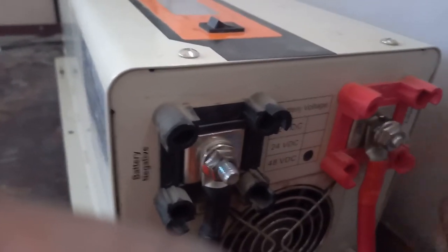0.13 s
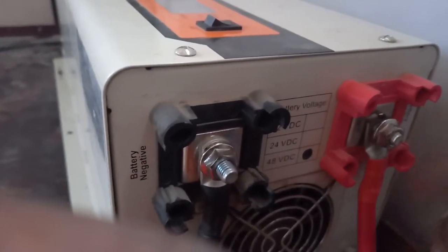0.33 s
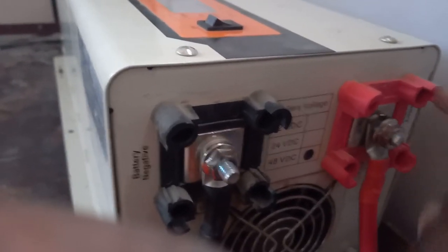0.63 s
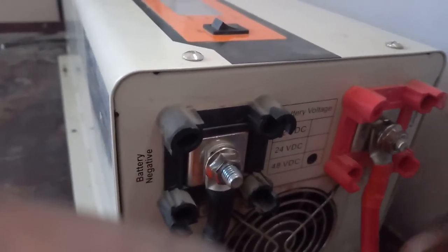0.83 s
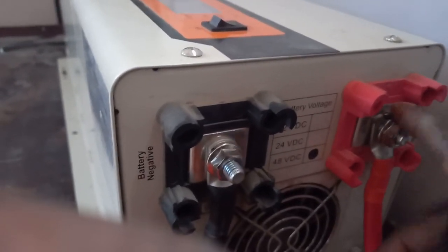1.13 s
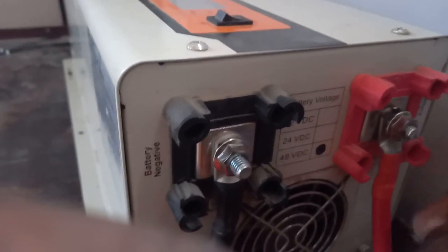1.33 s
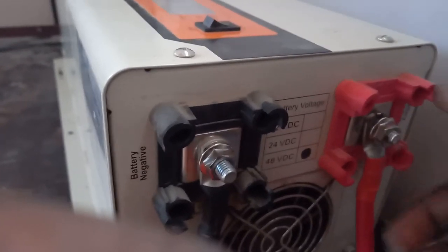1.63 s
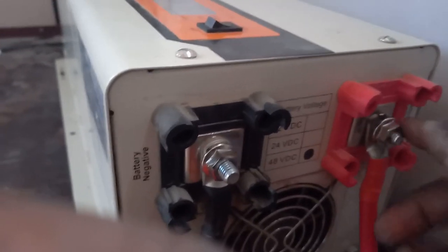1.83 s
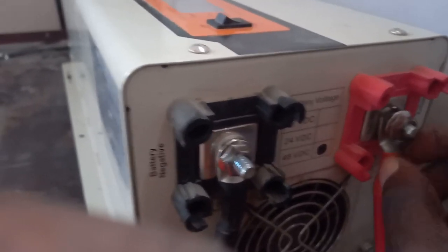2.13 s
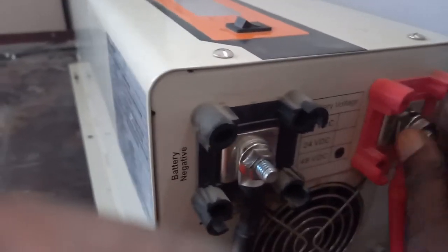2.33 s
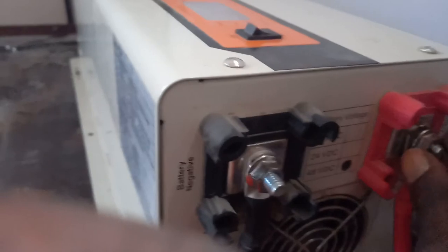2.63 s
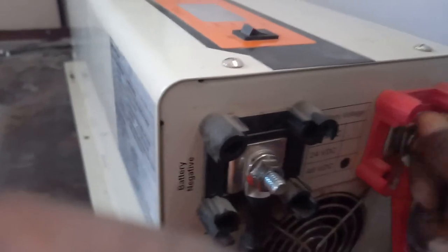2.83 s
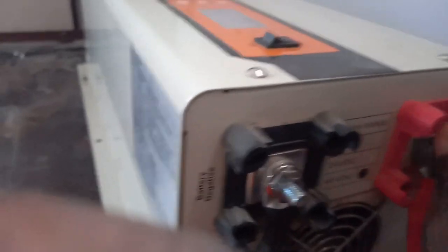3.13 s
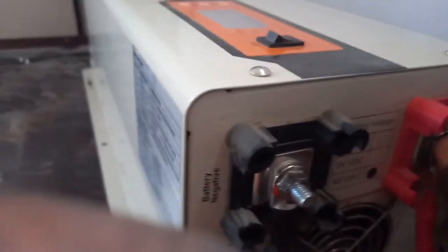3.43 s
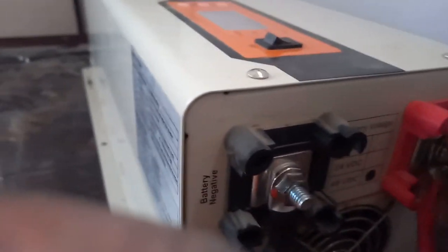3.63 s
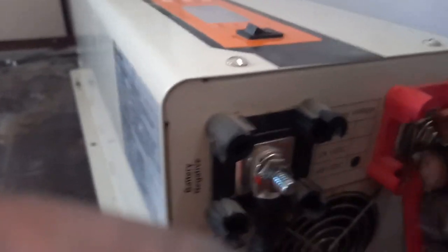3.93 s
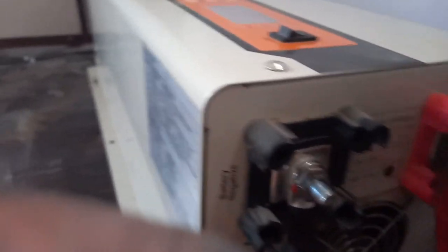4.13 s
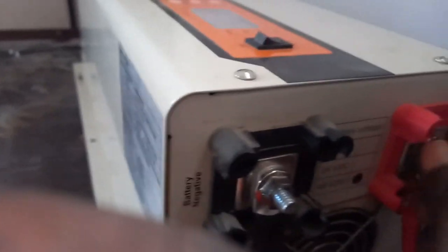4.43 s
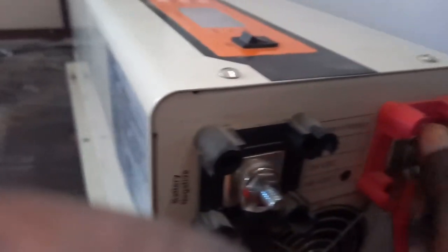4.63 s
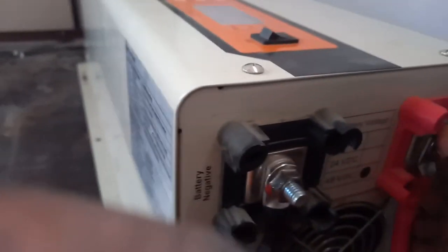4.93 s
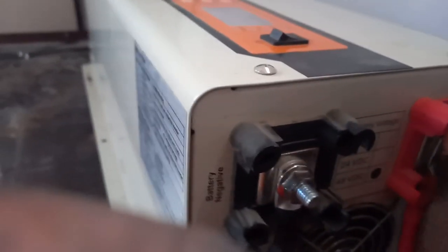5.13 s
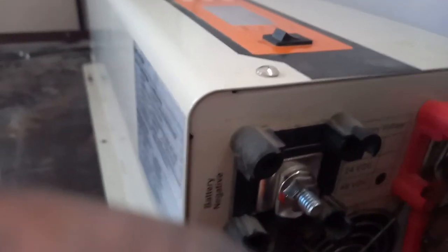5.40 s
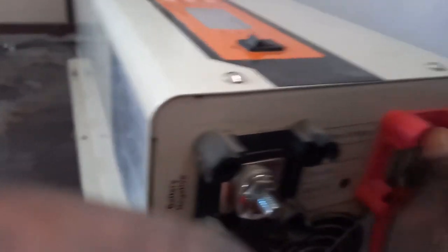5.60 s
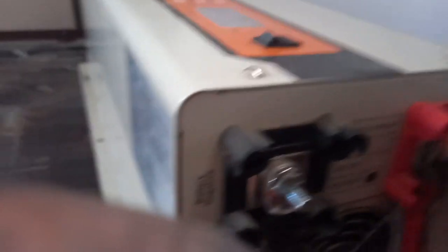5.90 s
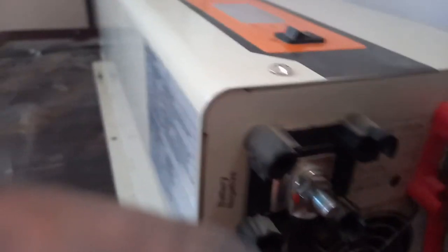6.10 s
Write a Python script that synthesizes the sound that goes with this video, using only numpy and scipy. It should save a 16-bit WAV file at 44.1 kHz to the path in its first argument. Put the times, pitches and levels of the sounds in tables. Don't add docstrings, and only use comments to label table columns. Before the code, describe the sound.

A steel nut is flicked along a threaded stud on a metal case, sharp irregular rattling clicks softening into sparse dull nudges in a small room.

```python
import sys
import numpy as np
from scipy import signal
from scipy.fft import rfft, irfft, next_fast_len
from scipy.io import wavfile
from scipy.ndimage import uniform_filter1d

SR = 44100
rng = np.random.default_rng(int(sys.argv[2]) if len(sys.argv) > 2 else 0)


def transcribe(signal):
    frames = np.atleast_2d(signal).T
    limited = np.clip(frames, -1, 1)
    pcm = np.round(limited * 32767).astype(np.int16)
    wavfile.write(sys.argv[1], SR, pcm)


def boost(x):
    u = np.asarray(x, float) / 20
    return 10 ** u


N = 276066
SPOTS = 4


def rms_one(x):
    return x / np.sqrt(np.mean(x ** 2) + 1e-20)


def at_hz(points, hz):
    point_hz, value = np.array(points)[:, 0], np.array(points)[:, 1]
    return np.interp(np.log(hz), np.log(np.maximum(point_hz, 1)), value)


def pair(shape_db, size):
    # (frequency [Hz], correlation [-1..1])
    likeness = [(40, 0.7), (130, 0.96), (290, 0.95), (640, 0.75), (1400, 0.15), (3000, 0.012)]
    padded = next_fast_len(size + size % 2)
    hz = np.maximum(np.fft.rfftfreq(padded, 1 / SR), 1)
    mid, side = rfft(rng.standard_normal((2, padded)))
    alike = np.clip(at_hz(likeness, hz), 0, 1)
    both = np.sqrt(1 + alike) * mid + np.sqrt(1 - alike) * side * [[1], [-1]]
    return irfft(both * boost(shape_db(hz)), padded)[:, :size]


def range_pulses():
    thump_top_hz, clang_top_hz, tick_from_hz = 1700, 3900, 7600
    ranges = [
        (thump_top_hz, "low"),
        ([thump_top_hz, clang_top_hz], "band"),
        ([clang_top_hz, tick_from_hz], "band"),
        (tick_from_hz, "high"),
    ]
    click = signal.unit_impulse(128)
    filters = [signal.butter(3, edges, kind, fs=SR, output="sos") for edges, kind in ranges]
    return np.array([signal.sosfilt(sos, click) for sos in filters])


def stroke_db(column, lead_s, rise_db, fall_db):
    # (time [s], panel push [dB], thread grinding [dB], skin rustle [dB])
    strokes = np.array([(0.01, -31.5, -38.5, -78), (0.238, -34, -51, -92), (0.441, -30.5, -51, -90),
                        (0.642, -34, -45, -90), (0.908, -44, -67, -96), (1.209, -50, -53, -80),
                        (1.402, -35, -45, -82), (1.49, -48, -54.5, -86), (1.668, -41, -41.5, -84),
                        (1.919, -48.5, -52, -84), (2.39, -41.5, -52.5, -84.5), (2.55, -67.5, -60, -85),
                        (2.808, -48, -62, -86), (3.121, -53, -54, -88.5), (3.21, -41.5, -58, -84),
                        (3.45, -48, -48, -96), (3.6, -67, -71, -85), (3.82, -44.5, -55, -79),
                        (3.97, -53, -63.5, -78), (4.18, -47.5, -57.5, -74), (4.32, -57.5, -67, -81.5),
                        (4.5, -56, -65, -81), (4.671, -49, -61.5, -81), (4.8, -41.5, -61.5, -84.5),
                        (5.03, -72, -73, -76.5), (5.23, -41.5, -61.5, -78), (5.398, -46, -67, -84),
                        (5.53, -47.5, -57, -81.5), (5.75, -54.5, -62.5, -86), (5.93, -46.5, -56.5, -78)])
    t = np.arange(0, N + 64, 64) / SR
    late = t - (strokes[:, :1] - lead_s)
    db = strokes[:, column, None] - np.where(late < 0, -late * rise_db, late * fall_db)
    total_db = 10 * np.log10(np.sum(boost(2 * db), axis=0) + 1e-14)
    return np.interp(np.arange(N) / SR, t, total_db)


def knocks(pulses, uneven_db, count):
    # (time [s], peak [dB], thump share [dB], crispness [dB])
    spins = [(0.0024, -23.5, -13, -8.5), (0.0224, -32, -18, -1.5), (0.152, -44, -13, 5),
             (0.1707, -22, -20, -11), (0.185, -23, -13.5, -4), (0.2487, -32, -11, -4),
             (0.3737, -30.5, -20, -7), (0.4059, -19, -16, -5.5), (0.4675, -41, 1, 4), (0.617, -17, -17, -7),
             (0.8551, -36, -12, 4), (0.8787, -47, -6, -10.5), (1.0715, -33.5, -28, -0.5),
             (1.1367, -28.5, -9, -4.5), (1.1436, -22, -27, -2), (1.228, -48.5, -5, 8),
             (1.3421, -33, -22, -8.5), (1.3583, -21, -27, -2), (1.3712, -15.5, -11, -8),
             (1.4103, -34.5, -5, 1.5), (1.5944, -41.5, -3, 10), (1.6192, -26, -22, 6),
             (1.7602, -29, -53, -8.5), (1.8093, -41, -26, -15)]
    # (time [s], peak [dB], thump share [dB], crispness [dB])
    turns = [(2.2164, -58.5, -10, -10), (2.2709, -27, -23, -15), (2.2853, -25, -22.5, -6),
             (2.3056, -21.5, -18, -7.5), (2.373, -31.5, -14, -13), (2.645, -52, -16, -7),
             (2.663, -40.5, -25.5, -8.5), (2.6775, -35, -20, -9), (2.6901, -30, -22, -7),
             (2.831, -44.5, -17.5, -10), (3.0535, -27.5, -33, -1.5), (3.0645, -25, -24, -5.5),
             (3.1199, -26.5, -19.5, -8.5), (3.1463, -26.5, -15.5, -8), (3.163, -21.5, -19, -5),
             (3.2377, -48, -15, -4), (3.3241, -41, -13, -15), (3.3402, -40, -13.5, -11.5),
             (3.3878, -39, -19, -12), (3.406, -36, -15.5, -1.5), (3.4271, -24, -18.5, -7.5),
             (3.5921, -67.5, -19, 0.5), (3.7282, -48, -23.5, -10), (3.7409, -31.5, -24, -10),
             (3.7792, -37, -16.5, -7), (3.8082, -43.5, -8, -7.5), (3.929, -65, 1, -13),
             (3.9664, -49, -13.5, -5)]
    # (time [s], peak [dB], thump share [dB], crispness [dB])
    nudges = [(4.0531, -44, -16, -8), (4.09, -34.5, -17, -11), (4.112, -28, -16.5, -12),
              (4.269, -52.5, -15.5, 0.5), (4.3813, -57.5, -7, -9), (4.3982, -45.5, -12.5, -13),
              (4.4107, -33.5, -13, -13), (4.4565, -41, -10.5, -14), (4.6298, -43.5, -5, -8),
              (4.6567, -40.5, -9, -15), (4.7535, -67, -3, 5), (4.8048, -42.5, -9.5, -11),
              (5.1318, -56, -8, -6), (5.1468, -42.5, -23, -6), (5.1583, -30, -13, -15),
              (5.2191, -53, 0.5, 0.5), (5.3083, -60.5, -4, 0), (5.3427, -42, -18, -3),
              (5.4731, -59.5, 4.5, -1), (5.4949, -39.5, -5.5, -25), (5.5195, -42, -14.5, -19),
              (5.5809, -47, -8.5, -13), (5.711, -45, -18, -5), (5.8613, -49.5, -5.5, -24),
              (5.874, -40, -11, -17), (5.96, -58, 3, -4), (6.061, -58, -8, -2.5)]
    # (time [s], peak [dB], thump share [dB],
    # crispness [dB], rattle length [ms])
    further_knocks = [(0.6265, -19, -11, -8, 8), (0.402, -24, -34, -7.5, 7.6), (0.586, -47, -24, 5, 5.3),
                      (0.5947, -45, -2, -4, 4), (1.8404, -20.5, -30.5, -6.5, 4.6), (2.3135, -22, -18.5, -7.5, 2.8),
                      (2.298, -24.5, -35, -7, 2.46), (3.719, -48, -18.5, -11.5, 5.2),
                      (4.715, -56.5, -0.5, -3, 6.5), (1.8489, -21, -19, -5.5, 5.6), (2.2348, -38, -21, -5, 1.6),
                      (2.3888, -23.5, -20, -9, 1.84), (2.722, -26, -13, -6.5, 6.2), (2.745, -32, -14, -13, 7.9),
                      (2.775, -43, -8.5, -6.5, 10.3), (3.082, -26.5, -17, -7, 7.1), (0.545, -55, -21, 3, 9.7),
                      (5.89, -45, -5, -16, 8.8)]
    rattle_ms = 4.1
    rows = [(*row, rattle_ms) for row in list(spins) + list(turns) + list(nudges)] + list(further_knocks)
    chance = rng.random((len(rows), count, 2))
    chance[:, 0] = 0, 1
    force = np.zeros((SPOTS, N + SR))
    for k, (s, db, thump_db, crisp_db, length_ms) in enumerate(rows):
        tick_db = 1.42 * crisp_db + 5
        pulse = boost(db + np.array([thump_db + 13.5, 0, crisp_db + 6.0, tick_db])) @ pulses
        for bounce, (late, size) in enumerate(chance[k]):
            at = int((s + late * length_ms / 1000) * SR)
            strength = (-1) ** bounce * boost(uneven_db * (size - 1))
            force[k % SPOTS, at:at + len(pulse)] += strength * pulse
    return force[:, :N]


def grinding(pulses, grind_db, per_s, uneven_db):
    sizes = boost(uneven_db * np.minimum(rng.exponential(1, N), 4)) * rng.choice([-1, 1], N)
    clicks = boost(grind_db - 18.0) * rms_one(sizes * (rng.random(N) < per_s / SR))
    clicks = signal.oaconvolve(clicks, boost([4.0, -2, -0.5, -7.0]) @ pulses)[:N]
    turn = np.arange(N) // 700 % SPOTS
    return clicks * (turn == np.arange(SPOTS)[:, None])


def case_response(crack_db, crack_t60_s, direct_t60_s, tail_db, rings_db):
    # (frequency [Hz], spectral density [dB])
    colour = [(150, -26), (240, -0.5), (450, 4), (700, -4.5), (1000, -4.5), (1750, -10.5), (2050, 0.5),
              (3000, -3.5), (4500, -11), (6000, -1.5), (6900, -9.5), (7700, -18.5), (11800, -14),
              (16000, -29)]
    # (frequency [Hz], decay time T60 [s])
    fading = [(200, 0.32), (530, 0.23), (1390, 0.26), (3680, 0.16), (9700, 0.16)]
    # (frequency [Hz], level [dB], decay time T60 [s])
    rings = [(379, -1, 0.47), (710, -8.5, 0.18), (1030, -10, 0.25), (1980, -14.5, 0.43), (2320, -9, 0.24),
             (2300, -10, 0.31), (2720, 3.5, 0.26), (3640, -19, 0.13), (4380, -11, 0.11), (5070, -14, 0.25),
             (5960, -8.5, 0.13), (5900, -13, 0.23), (5690, -29.5, 0.24), (6700, -14.5, 0.2)]
    # (frequency [Hz], left minus right [dB])
    left_lead = [(60, -6.5), (130, -5), (290, -2), (640, -8), (1410, 4), (3100, 5.5), (6820, 2.5),
                 (15000, 6.5)]
    size = SR * 2 // 5
    t = np.arange(size) / SR
    out = np.zeros((2, size))
    for hz in 220 * 2 ** np.arange(0, 6.4, .5):
        band = pair(lambda f: at_hz(colour, f) - 24 * np.log2(f / hz) ** 2, size)
        t60 = max(at_hz(fading, hz), .03)
        swell = 1 - np.exp(-t * hz / 11.0)
        crack = boost(crack_db - 60 * t / crack_t60_s) * (1 - np.exp(-t * hz / 0.88))
        crack *= min(hz / 1600, 1)
        dying = boost(-60 * t / direct_t60_s) + boost(tail_db - 60 * t / t60)
        out += band * (crack + swell * dying) / np.sqrt(t60)
    out = rms_one(out)
    for hz, db, t60 in rings:
        phase = rng.uniform(0, 2 * np.pi, (2, 1))
        share_db = 7.0 * rng.standard_normal()
        decay = boost(db + rings_db + share_db - 60 * t / t60)
        out += decay * np.sin(2 * np.pi * hz * t + phase) * (1 - np.exp(-t * 900))
    lead = at_hz(left_lead, np.maximum(np.fft.rfftfreq(size * 2, 1 / SR), 1)) / 2
    return irfft(rfft(out, size * 2) * boost([lead, -lead]), size * 2)[:, :size]


def through_case(force):
    size = next_fast_len(N + SR // 2)
    out = 0
    for spot in force:
        response = case_response(
            crack_db=15.0, crack_t60_s=0.0077, direct_t60_s=0.025, tail_db=3.0, rings_db=-6.5)
        out = out + rfft(spot, size) * rfft(response, size)
    return irfft(out, size)[:, :N]


def panels(push_db):
    # (frequency [Hz], bandwidth [Hz], level [dB])
    booms = [(78, 24, -10), (112.5, 12, -8), (139.7, 19, -1.5), (155.8, 16.6, 1.5), (210.4, 9.1, -6.5),
             (288.2, 34.8, -13)]
    shake = pair(lambda f: 0 * f, N + SR)
    out = 0
    for k, (hz, width, db) in enumerate(booms):
        r = np.exp(-np.pi * max(width, 3) / SR)
        poles = [1, -2 * r * np.cos(2 * np.pi * hz / SR), r * r]
        out = out + (-1) ** k * boost(db) * signal.lfilter([1 - r * r, 0, r * r - 1], poles, shake)
    out = out[:, SR:]
    power = uniform_filter1d(np.mean(out ** 2, axis=0), size=3000)
    even = out / np.sqrt(power + 0.26 * np.mean(out ** 2))
    return boost(push_db) * rms_one(even) * boost([[-1.4], [1.4]])


def rustle(rustle_db):
    colour = [(3000, -43), (5800, -1.5), (7600, -22.0), (9500, -3), (12500, 2.0), (15000, -8)]   # (Hz, dB)
    bright = pair(lambda f: at_hz(colour, f), N)
    flicker_db = 4.0 * np.interp(np.arange(N) / SR * 18, np.arange(130), rng.standard_normal(130))
    return boost(rustle_db + flicker_db + 5.0) * rms_one(bright)


def background():
    # (frequency [Hz], spectral density [dB])
    hiss_colour = [(20, -30), (45, -14), (80, -3.5), (110, -13), (150, -9.5), (230, -22), (570, -27.5),
                   (1100, -37.5), (2300, -38), (3600, -47), (6000, -35.5), (8000, -52), (11500, -44.5),
                   (15000, -58)]
    # (frequency [Hz], rms level [dB])
    whistles = [(11292, -79.5)]
    t = np.arange(N) / SR
    hiss = boost(-64) * rms_one(pair(lambda f: at_hz(hiss_colour, f), N))
    swell_db = 4.0 * np.interp(t * 7, np.arange(60), rng.standard_normal(60))
    whistle = 0
    for hz, db in whistles:
        whistle = whistle + np.sqrt(2) * boost(db + swell_db) * np.sin(2 * np.pi * hz * t)
    return hiss + whistle * boost([[1.5], [-1.5]])


def scene():
    push_db = stroke_db(1, lead_s=0.0, rise_db=267, fall_db=133)
    grind_db = stroke_db(2, lead_s=0.044, rise_db=820, fall_db=139)
    rustle_db = stroke_db(3, lead_s=0.0, rise_db=77, fall_db=41)
    pulses = range_pulses()
    force = knocks(pulses, uneven_db=24.5, count=5)
    force = force + grinding(pulses, grind_db, per_s=2100, uneven_db=2.0)
    return boost(-19.5) * through_case(force) + panels(push_db) + rustle(rustle_db) + background()


def roll_off(x):
    return signal.sosfilt(signal.butter(12, 16660, fs=SR, output="sos"), x)


def record(dry):
    for hz, sharpness in [(7350, 10.0), (7900, 33.0)]:
        dry = signal.lfilter(*signal.iirnotch(hz, sharpness, fs=SR), dry)
    top_cut = signal.cheby2(10, 45, 16900, fs=SR, output="sos")
    return roll_off(signal.sosfilt(top_cut, dry))


dry = scene()
out = record(dry)
transcribe(out)
```